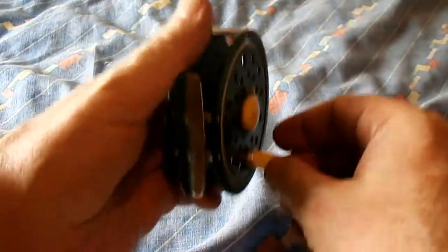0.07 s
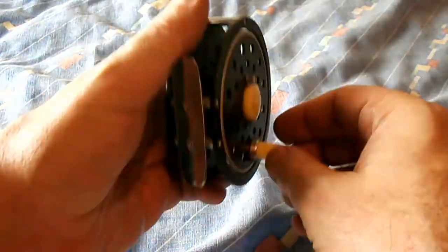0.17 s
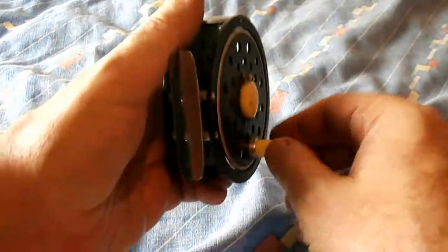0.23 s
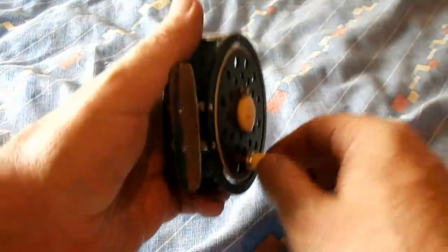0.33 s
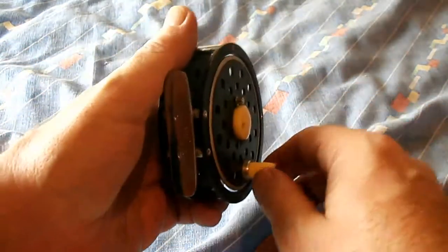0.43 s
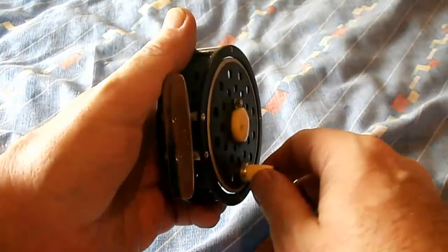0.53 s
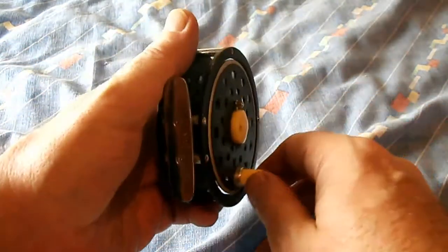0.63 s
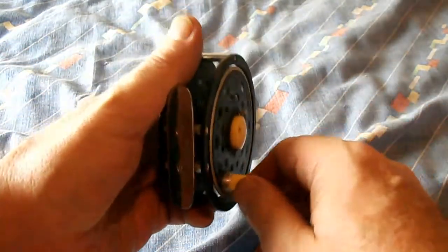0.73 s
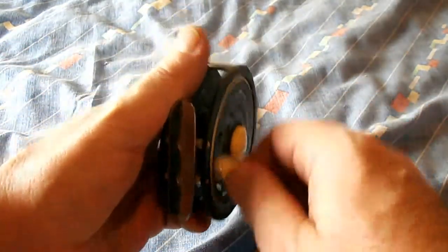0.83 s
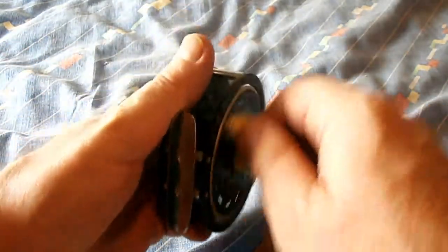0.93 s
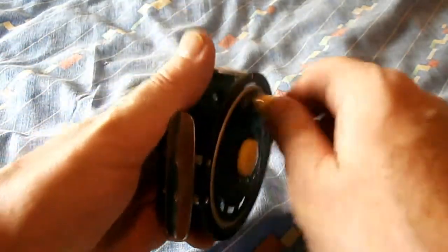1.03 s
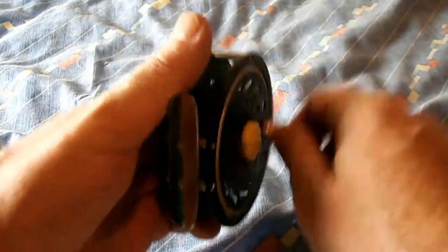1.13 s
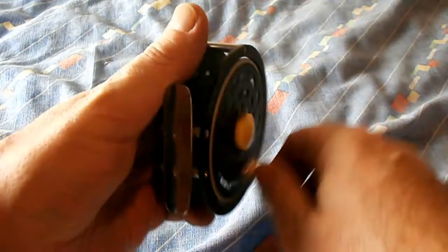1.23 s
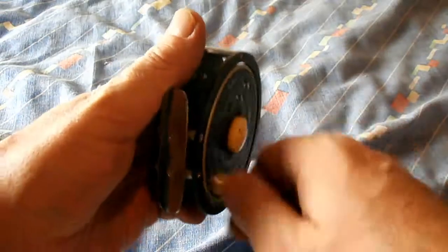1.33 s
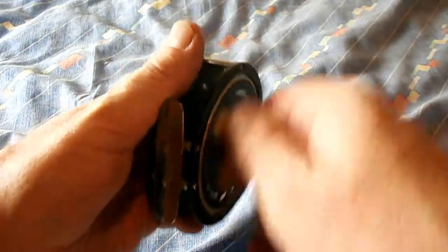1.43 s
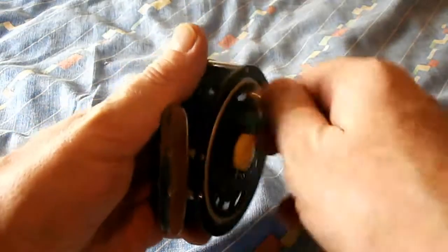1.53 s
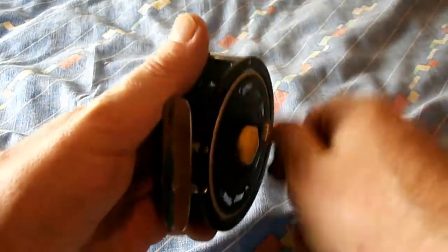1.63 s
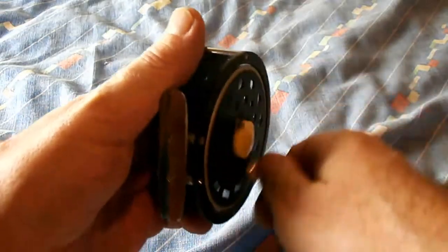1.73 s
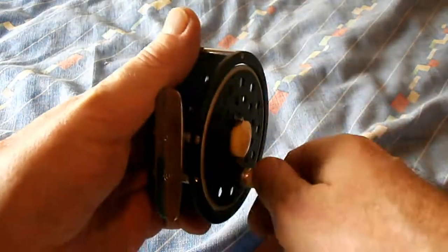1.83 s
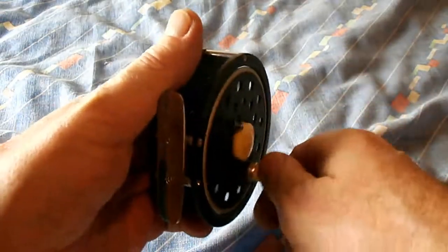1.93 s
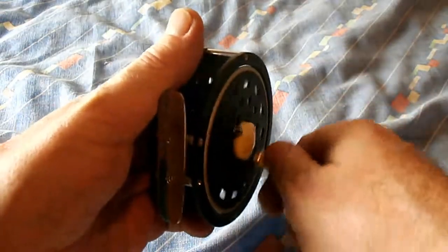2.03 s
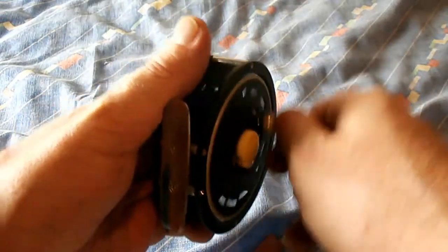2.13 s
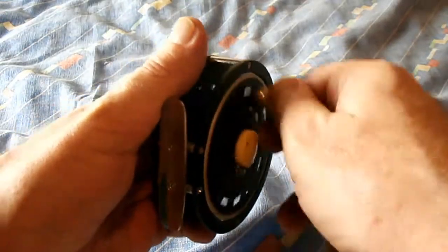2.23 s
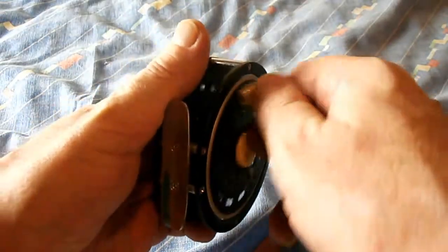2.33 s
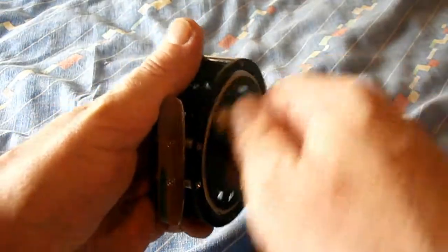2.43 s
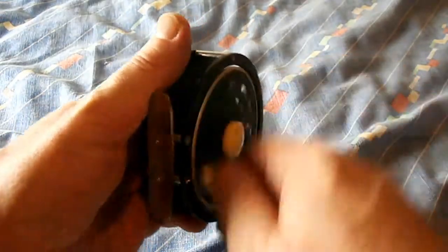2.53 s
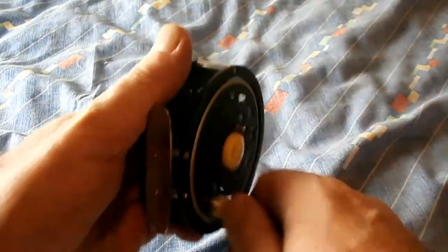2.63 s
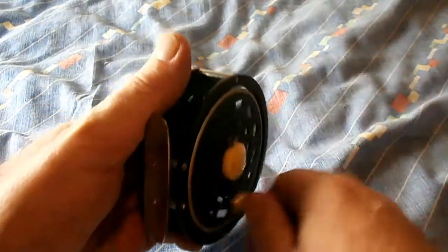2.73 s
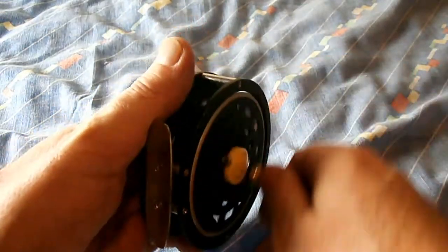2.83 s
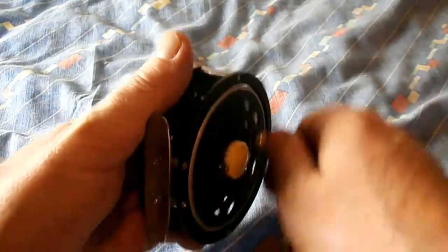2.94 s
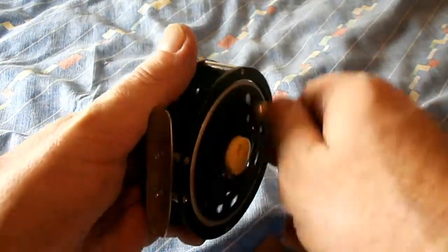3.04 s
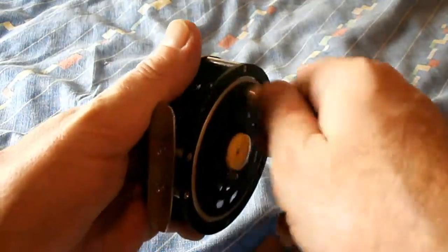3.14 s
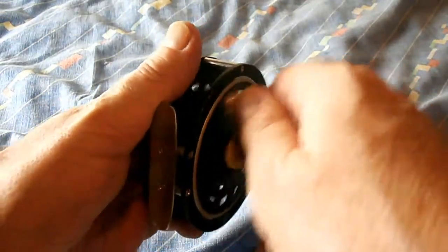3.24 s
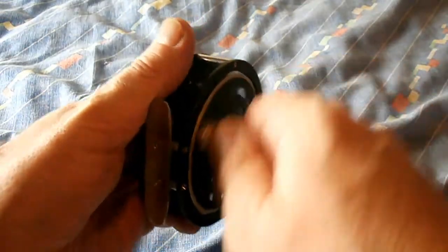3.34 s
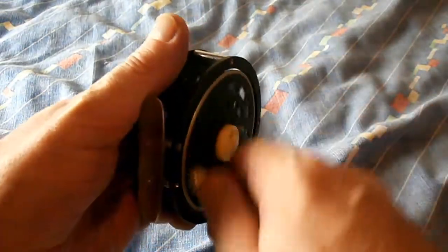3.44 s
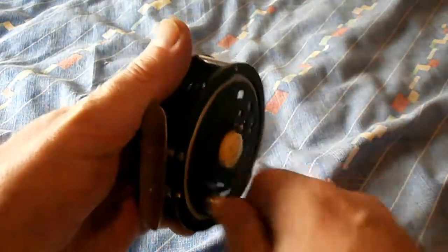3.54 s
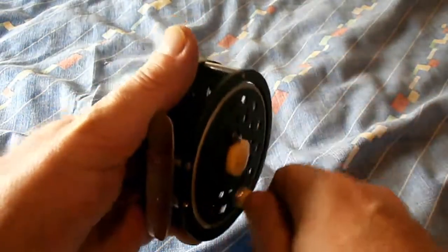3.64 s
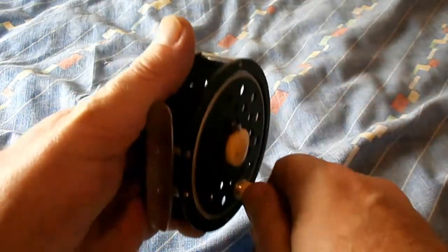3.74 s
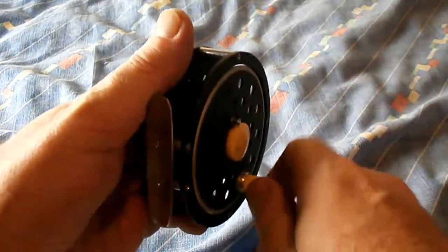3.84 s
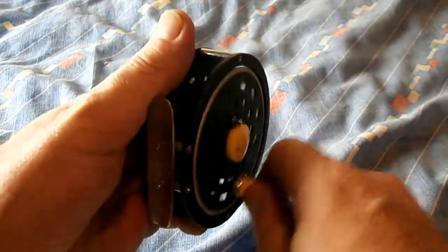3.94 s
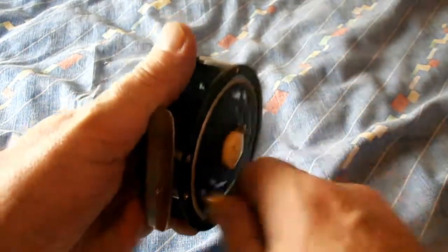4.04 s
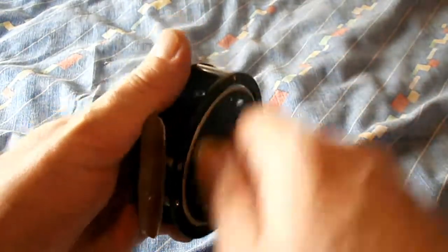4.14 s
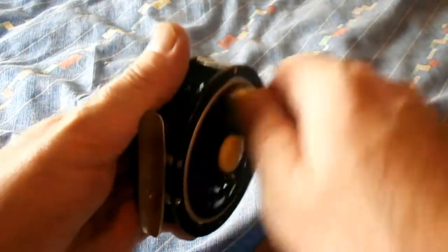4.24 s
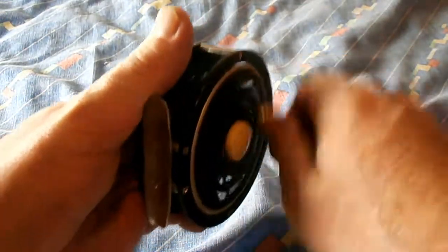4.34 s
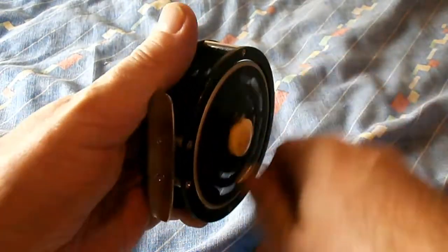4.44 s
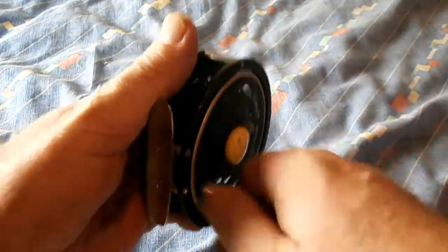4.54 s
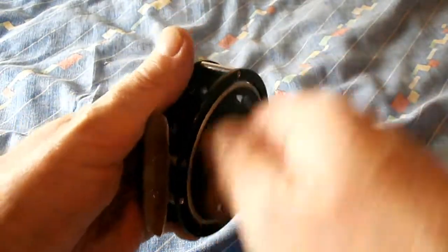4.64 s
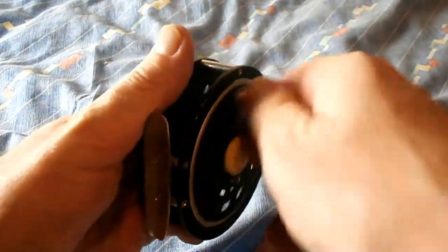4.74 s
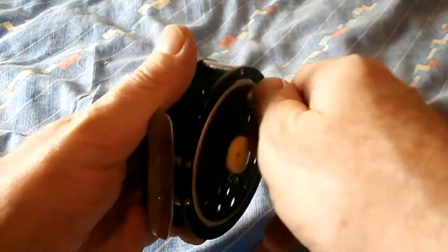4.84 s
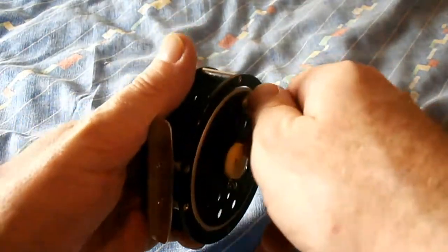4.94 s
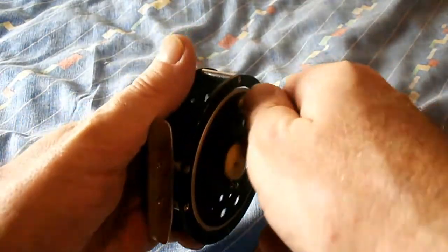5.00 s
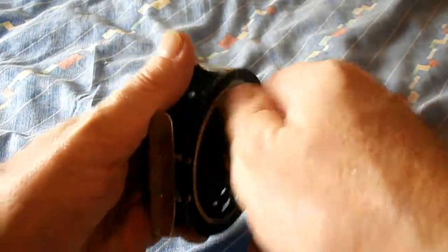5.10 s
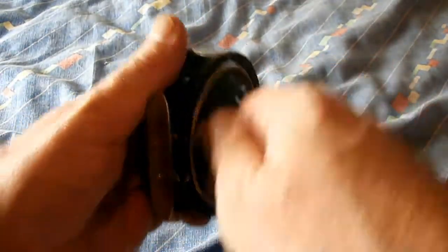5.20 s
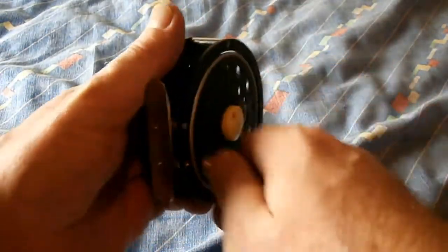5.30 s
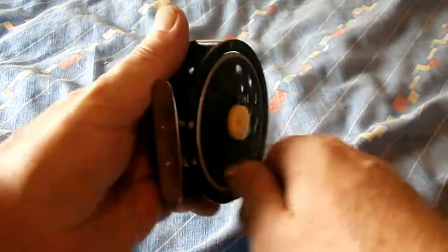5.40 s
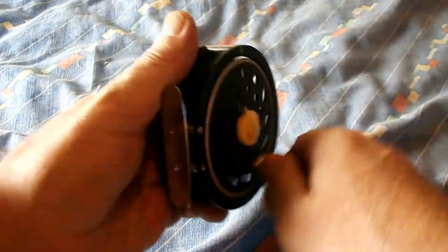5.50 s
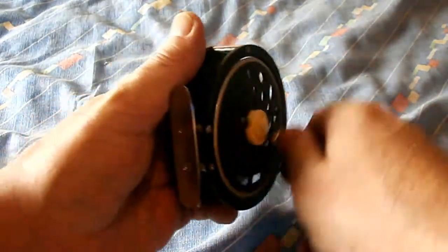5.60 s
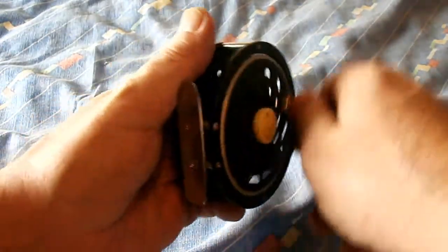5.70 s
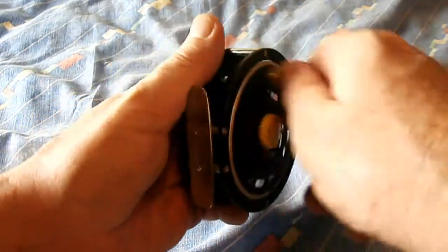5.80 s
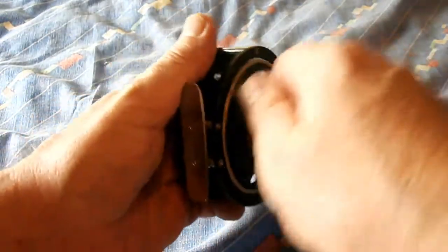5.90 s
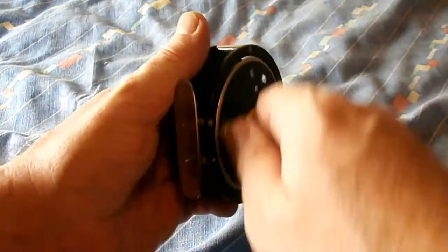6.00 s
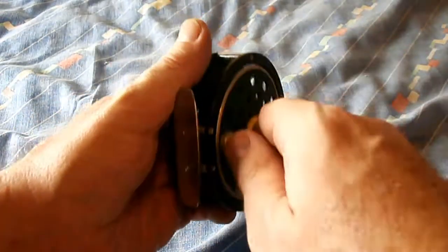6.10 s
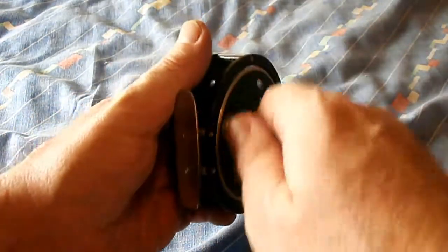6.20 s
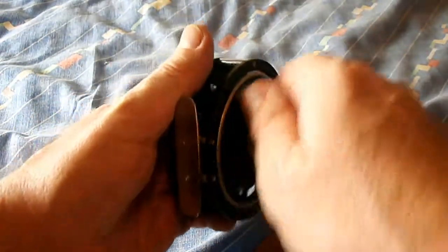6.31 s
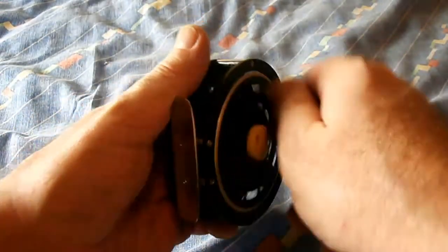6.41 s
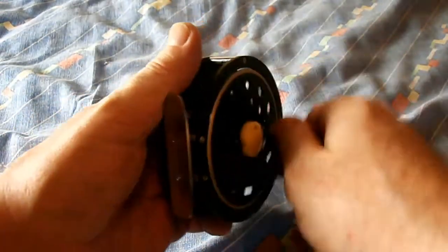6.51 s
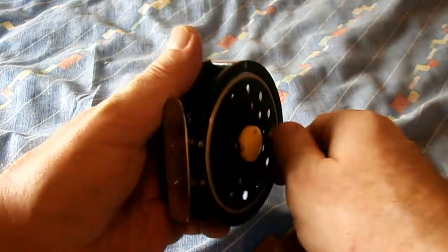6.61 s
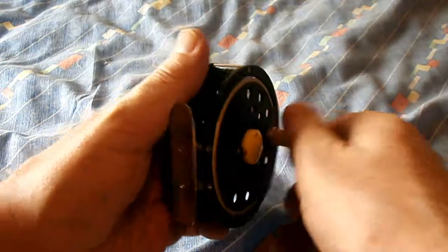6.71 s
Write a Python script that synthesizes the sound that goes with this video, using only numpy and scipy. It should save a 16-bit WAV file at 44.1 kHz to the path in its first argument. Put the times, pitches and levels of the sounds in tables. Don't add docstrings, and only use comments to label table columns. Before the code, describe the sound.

Crisp metallic ratchet clicks run in four bursts, alternating softer and harder, with tiny finger ticks between them in a quietly humming furnished room.

```python
import sys
import numpy as np
from scipy import signal
from scipy.fft import rfft, irfft
from scipy.io import wavfile
from scipy.ndimage import uniform_filter1d

SR = 44100
rng = np.random.default_rng(int(sys.argv[2]) if len(sys.argv) > 2 else 0)


def master(y):
    cut = np.clip(np.atleast_2d(y).T, -1, 1)
    pcm = np.round(cut * 32767)
    wavfile.write(sys.argv[1], SR, pcm.astype(np.int16))


def magnitude_from_level(level_db):
    exponent = np.asarray(level_db, float) / 20
    return 10 ** exponent


N = 298116

# (times the spool ring time, in s, to fall 60 dB)
SPOOL_MODES = [(6667, -1.5, 1.74), (6170, -12, 3.4), (6857, -3.5, 0.66), (6977, -2.5, 3.06),
               (7563, 4, 0.74), (8222, -0.5, 1.96), (9100, -15, 1.7), (8642, -1.5, 2.53), (9452, 1.5, 1.03),
               (9420, -5.5, 0.58), (10720, -2, 1.24), (12225, 0, 0.85), (13400, -27, 0.12),
               (12720, -1, 0.41), (14120, -6.5, 1.02)]


def shape(hz, points):
    point_hz, point_db = np.array(points).T
    return magnitude_from_level(np.interp(np.log(np.maximum(hz, 1)), np.log(point_hz), point_db))


def band(x, lo_hz, hi_hz):
    return signal.sosfilt(signal.butter(2, [lo_hz, hi_hz], "band", fs=SR, output="sos"), x)


def add(out, start_s, x):
    i = int(start_s * SR)
    out[i:i + len(x)] += x[:len(out) - i]


def ring(modes, gains, phase, length_s=.08):
    t = np.arange(int(length_s * SR))[:, None] / SR
    hz, db, t60_s = np.transpose(modes)
    fade = np.exp(-np.log(1000) * t / t60_s)
    return (magnitude_from_level(db) * gains * fade * np.sin(2 * np.pi * hz * t + phase)).sum(axis=1)


def snaps():
    # start_s, push_db (toward the microphone), spread_db (into the room),
    # frame_hz (strongest frame tone), frame_db
    forward = [(0.8851, -6, -42, 3020, -49), (1.0396, -1.5, -37, 1800, -50),
               (1.1690, 4, -38.5, 3020, -53.5), (1.3078, -6, -41, 1800, -52),
               (1.4313, -6.5, -41.5, 2930, -56), (1.5401, 0.5, -37, 1800, -50.5),
               (1.6694, 0.5, -38, 2870, -50.5), (4.1262, -4, -43, 1800, -53),
               (4.2507, -1.5, -37, 3000, -58), (4.3702, -5.5, -39, 1990, -43.5),
               (4.487, -3, -41, 1800, -53), (4.6118, -2, -42.5, 1800, -53.5),
               (4.7383, 0.5, -37.5, 2870, -56), (6.3952, 7, -38, 3170, -53),
               (6.5427, 0.5, -38.5, 2335, -50)]
    # start_s, push_db, spread_db, frame_hz
    backward = [(2.2154, 3.5, -41.5, 2860), (2.3224, 0.5, -40, 2900), (2.43, -4, -38, 3170),
                (2.5215, -1, -39, 3200), (2.5891, -3.5, -37, 2870), (2.7067, 1, -39.5, 2334),
                (2.8035, -10, -42, 3110), (2.9184, -3, -40, 2780), (3.0514, -2, -40, 2960),
                (3.193, 4, -39.5, 3020), (3.3, 6.5, -39, 3080), (3.4017, 0.5, -38, 2820),
                (3.498, -1, -40, 2360), (3.5935, 1, -40.5, 2870), (5.1694, -6, -40.5, 2860),
                (5.257, -0.5, -39.5, 3200), (5.3419, -1, -39, 2980), (5.4587, -1.5, -39.5, 2310),
                (5.5544, -0.5, -38.5, 2350), (5.6895, 1, -39.5, 3220), (5.7827, 1, -39, 2930),
                (5.8519, 1, -41.5, 2370), (5.9311, -7, -42, 2960), (6.0198, -1.5, -40, 2760)]
    back_frame_db = -53
    rows = [(*row, False) for row in forward]
    rows += [(*row, back_frame_db, True) for row in backward]
    out = []
    for *row, back in rows:
        cage_db = -45 if back else -63
        if row[3] < 1900:
            cage_db -= 7.5
        out.append((*row, cage_db, back))
    return sorted(out)


def air():
    # pitch_hz, level_db (per Hz)
    hiss_colour = [(15, -13), (40, -9), (80, -6), (200, 0), (575, -7), (1700, -17), (3300, -17),
                   (5500, -21), (7500, -20), (9840, -14), (11500, -22.5), (13400, -26), (15850, -21),
                   (15990, -60)]
    # pitch_hz, level_db (rms)
    whine = [(3262, -80), (4064, -84), (4732, -86), (7330, -87), (14718, -82), (14890, -79), (14947, -60.5),
             (15004, -77), (15176, -82)]
    # time_s, level_db (rms)
    swell = [(0, -79), (.5, -77.5), (1.2, -73), (1.8, -72), (2.15, -70.5), (3, -84), (3.9, -81), (5, -73.5),
             (6.2, -68.5), (6.4, -73), (6.76, -79)]
    t = np.arange(N) / SR
    noise = irfft(rfft(rng.standard_normal(N)) * shape(np.fft.rfftfreq(N, 1 / SR), hiss_colour), N)
    out = magnitude_from_level(-61.5) * noise / noise.std()
    swell_db = np.interp(t, *np.transpose(swell))
    for hz, db in [*whine, (3398, swell_db)]:
        waver = uniform_filter1d(np.repeat(rng.standard_normal(N // 4000 + 1), 4000), 4000)[:N]
        out += np.sqrt(2) * magnitude_from_level(db + 0.53 * waver) * np.sin(2 * np.pi * hz * t + .3 * waver)
    return out


def diffuse():
    # pitch_hz, level_db
    spread_colour = [(1500, -25), (3000, -9.5), (5200, -13), (5900, 2.5), (6300, 2.5), (7250, 6), (8000, 5),
                     (8900, -3), (9900, -1.5), (11300, -1.5), (13000, -5), (15700, -8), (16000, -54)]
    t60_s, top_t60_s, build_s, room_db = 0.18, 0.15, 0.029, 17
    out, size = np.zeros(N), 16384
    t, hz = np.arange(size) / SR, np.fft.rfftfreq(size, 1 / SR)
    treble = 1 / (1 + (9700 / np.maximum(hz, 1)) ** 8)
    bunches = uniform_filter1d(np.repeat(rng.standard_normal(size // 128), 128), 128)
    build = (1 - np.exp(-t / build_s)) * magnitude_from_level(1.5 * bunches)
    for start_s, _, spread_db, _, _, cage_db, back in snaps():
        if back:
            centre_hz, width_hz, cage_lift_db, treble_db = 3990, 860, 2.2, 3.6
        else:
            centre_hz, width_hz, cage_lift_db, treble_db = 4187, 218, 19.5, -4.5
        cage_peak = 1 / (1 + (2 * (hz - centre_hz) / width_hz) ** 2)
        cage = magnitude_from_level(cage_db - spread_db + cage_lift_db) * cage_peak
        modes = np.zeros(len(hz))
        for (mode_hz, *_), chance in zip(SPOOL_MODES[:9], rng.standard_normal(9)):
            modes += magnitude_from_level(5 * chance) / (1 + ((hz - mode_hz) / 90) ** 2)
        colour = shape(hz, spread_colour) * (.55 + .6 * modes) + cage
        noise = rfft(rng.standard_normal(size)) * colour
        low = irfft(noise * (1 - treble), size) * magnitude_from_level(-60 * t / t60_s)
        high = irfft(noise * treble, size) * magnitude_from_level(-60 * t / top_t60_s)
        haze = build * (low + magnitude_from_level(treble_db) * high)
        add(out, start_s + 0.002, magnitude_from_level(spread_db + room_db) * haze)
    return out


def room(x):
    # delay_s, level_db
    echoes = [(.0017, -27), (.0025, -9), (.009, -30), (0.011, -31.5), (0.0238, -51), (.038, -70)]
    sway_share, sway_s = .07, .09
    out, hold = np.zeros(N), int(sway_s * SR)
    for (delay_s, db), chance in zip(echoes, rng.standard_normal((len(echoes), 12))):
        sway = np.repeat(rng.standard_normal(N // hold + 1), hold)[:N]
        drift = 1 + sway_share * uniform_filter1d(sway, hold // 2)
        source = np.arange(N) - np.round(delay_s * SR * drift).astype(int)
        smear = np.r_[.9, .25 * chance[1:]]
        out += magnitude_from_level(db) * np.convolve(x[np.maximum(source, 0)], smear)[:N]
    return x + band(out, 4200, 9800)


def fingers():
    # start_s, peak_db, ring_hz, t60_s, pin_db (ring of the handle pin)
    ticks = [
        (0.226, -51, 3400, .015, -13),
        (0.2892, -43.5, 2960, 0.011, -16),
        (0.994, -46, 8700, 0.0096, -40),
        (2.177, -46.5, 7400, .02, -40),
        (3.679, -50, 2780, 0.013, -40),
        (3.9355, -46.5, 2780, .02, -18),
        (6.3455, -46.5, 7630, 0.022, -40),
        (6.365, -54, 7600, 0.009, -40),
        (6.6894, -47.5, 2840, 0.027, -38),
        (6.741, -51.5, 2350, 0.16, -6),
    ]
    # start_s, level_db, from_hz gliding to_hz, push_s, t60_s
    bump = (3.737, -50.5, 500, 880, .022, .2)
    out, t = np.zeros(N), np.arange(9000) / SR
    for (start_s, db, hz, t60_s, pin_db), chance in zip(ticks, rng.standard_normal((len(ticks), 300))):
        tick = ring([(hz, -4, t60_s), (5350, pin_db, .07), (7750, pin_db - 3, .07)], 1, 0)
        crack = chance * np.exp(-t[:300] / 0.002)
        tick[:300] += magnitude_from_level(5.5) * band(crack, hz / 1.48, hz * 1.34)
        add(out, start_s, magnitude_from_level(db) * tick)
    start_s, db, from_hz, to_hz, push_s, t60_s = bump
    rub = rng.standard_normal(len(t))
    late = np.clip(t / push_s, 0, 1)
    body = (1 - late) * band(rub, .5 * from_hz, 1.4 * from_hz) + late * band(rub, .6 * to_hz, 1.2 * to_hz)
    body = 5 * body + magnitude_from_level(-13) * band(rub, 1500, 4800)
    fade_db = -60 * np.maximum(t - push_s, 0) / t60_s
    add(out, start_s, magnitude_from_level(db + fade_db) * body)
    return out


def struck(modes, best_hz, chance, favour_db, scatter_db, slow):
    hz, db, t60_s = np.transpose(modes)
    size = len(modes)
    favour = np.exp(-.5 * (np.log(hz / best_hz) / .03) ** 2)
    gains = magnitude_from_level(favour_db * favour + scatter_db * chance[:size])
    hz = hz * (1 + .012 * chance[:size][::-1])
    return ring(np.c_[hz, db, slow * t60_s], gains, 1.624 * chance[size:2 * size])


def pawl():
    # pitch_hz, level_db, t60_s
    cage_modes = [(3354, 10, 0.008), (3909, 3.5, 0.019), (4540, 0, 0.023), (4296, 7.5, 0.0043),
                  (5100, -78, 0.0014), (5410, 3.5, 0.0086)]
    # pitch_hz, level_db, t60_s
    frame_modes = [(1800, -6, .06), (1990, -7, .05), (2335, -4, .05), (2870, -3, .03), (3000, 1, .045),
                   (3130, -4, .03)]
    spool_t60_s = .0052
    out, t = np.zeros(N), np.arange(400) / SR
    events = snaps()
    for event, chance in zip(events, rng.standard_normal((len(events), 500))):
        start_s, push_db, _, frame_hz, frame_db, cage_db, back = event
        best_hz = 7250 + 350 * chance[29]
        spool = struck(SPOOL_MODES, best_hz, chance, favour_db=8.0, scatter_db=2.5, slow=spool_t60_s)
        if not back:
            spool -= (1 - magnitude_from_level(-4.5)) * band(spool, 10750, 16370)
        high_db, mid_db, low_db = (8.5, -3, -8) if back else (-1, -10, -11)
        crack = chance[100:] * np.exp(-t / .001)
        spool[:400] += magnitude_from_level(high_db) * band(crack, 13800, 15965)
        spool[:400] += magnitude_from_level(mid_db) * band(crack, 11440, 12100)
        spool[:400] += magnitude_from_level(low_db) * band(crack, 950, 5700)
        cage_hz, cage_slow = (3850, .35) if back else (4170, .9)
        cage = struck(cage_modes, cage_hz, chance[30:], favour_db=0, scatter_db=1.5, slow=cage_slow)
        frame = struck(frame_modes, frame_hz, chance[50:], favour_db=9, scatter_db=2.5, slow=0.67)
        body = magnitude_from_level(cage_db + 23.0) * cage + magnitude_from_level(frame_db + 10.0) * frame
        add(out, start_s - .0001, magnitude_from_level(push_db - 14.0) * spool + body)
    return out


def scene():
    return (room(pawl() + fingers()) + diffuse() + air())[None]


def band_limit(x):
    return signal.sosfilt(signal.butter(12, 16960, fs=SR, output="sos"), x)


def record(dry):
    clip, knee = .17, 8
    clipped = clip * dry / (clip ** knee + dry ** knee) ** (1 / knee)
    hold = np.exp(-1 / (.03 * SR))
    recent = signal.lfilter([1 - hold], [1, -hold], np.abs(clipped))
    ducked = clipped / (1 + recent / 0.1)
    x = signal.sosfiltfilt(signal.cheby1(5, .5, 15750, fs=SR, output="sos"), ducked)
    x = signal.sosfilt(signal.butter(1, 45, "high", fs=SR, output="sos"), x)
    return band_limit(x)


dry = scene()
out = record(dry)
master(out)
```